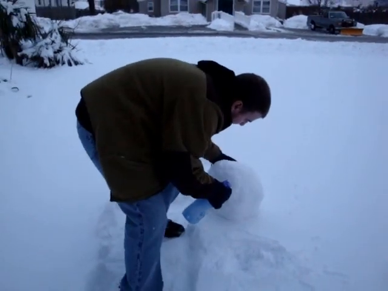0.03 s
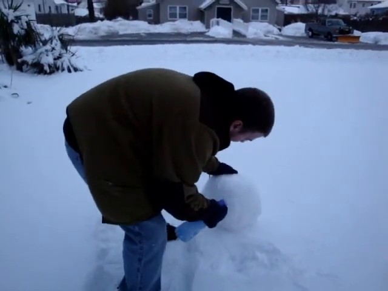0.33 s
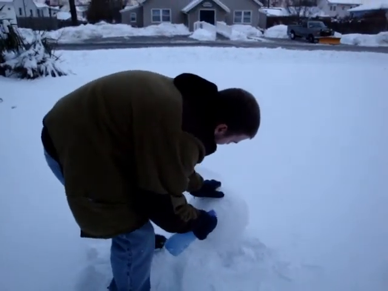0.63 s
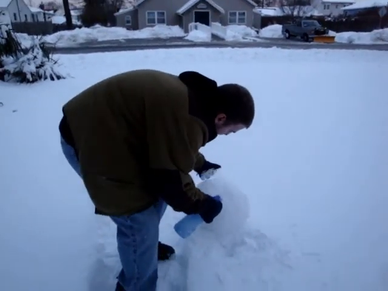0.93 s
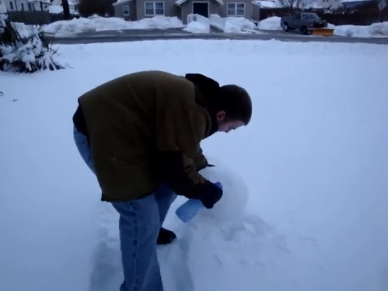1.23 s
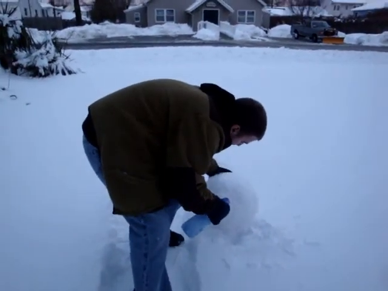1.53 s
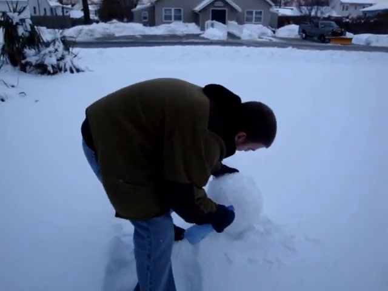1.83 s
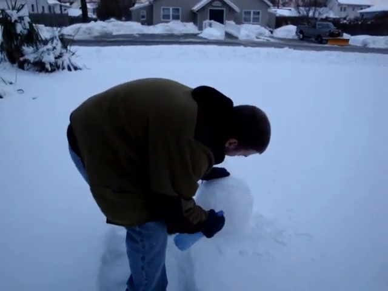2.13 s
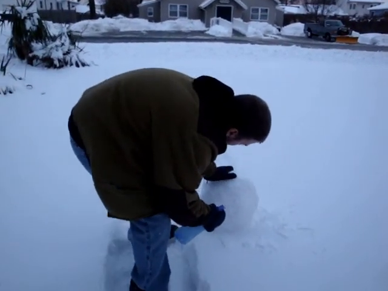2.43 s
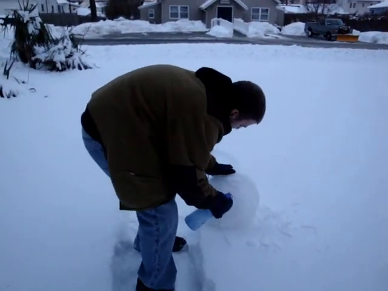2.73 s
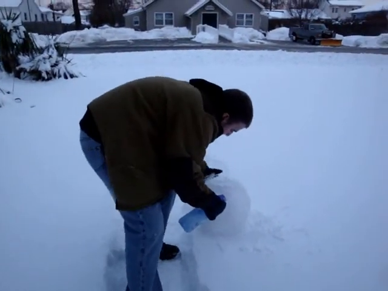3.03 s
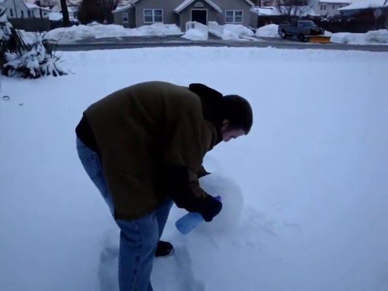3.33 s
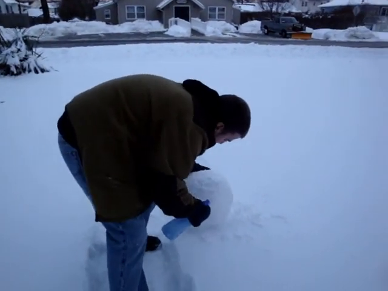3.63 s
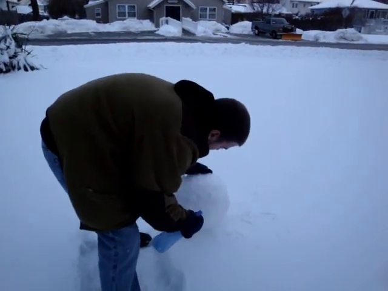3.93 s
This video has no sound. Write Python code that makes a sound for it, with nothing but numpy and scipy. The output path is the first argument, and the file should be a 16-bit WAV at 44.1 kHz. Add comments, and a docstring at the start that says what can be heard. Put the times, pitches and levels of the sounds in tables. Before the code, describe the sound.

A spray bottle squirts repeatedly with plastic clicks, amid dull knocks on the microphone.

```python
"""A trigger spray bottle mists a large snowball in a snowy yard, about three strokes a second.
Close by, each stroke clicks the plastic trigger, often chirps the pump valve, and lets out a puff of hiss.
Right at the microphone, fingers knock dully on the camera body; its audio coding adds a faint fizz to each.
A boot shifts in the snow, and the street murmurs far away. The snow gives no echo."""
import sys
import numpy as np
from scipy import signal
from scipy.fft import rfft, irfft, next_fast_len
from scipy.io import wavfile
from scipy.ndimage import map_coordinates

SR = 44100
rng = np.random.default_rng(int(sys.argv[2]) if len(sys.argv) > 2 else 0)


def generate_wav(signal):
    """Clip the signal to [-1, 1] and save it as 16-bit WAV at the path in sys.argv[1]."""
    frames = np.transpose(np.atleast_2d(signal))
    scaled = np.clip(frames, -1, 1) * 32767
    pcm = np.round(scaled).astype(np.int16)
    wavfile.write(sys.argv[1], SR, pcm)


N = 176400  # 4 s

# pulls of the trigger: t/s, relative level/dB
STROKES = [(.1476, -21), (0.4476, -20), (0.7659, -17.5), (1.0830, -18.5), (1.39, -20), (1.6955, -19.5),
           (1.9886, -18.5), (2.2874, -19.5), (2.5966, -18), (2.9091, -21), (3.2218, -17.5), (3.5416, -18),
           (3.8463, -21)]
# the three clicks within a stroke: t/s after the pull, level/dB against the stroke
STROKE_CLICKS = [(0, -4), (0.0116, -0.5), (0.0196, -8.5)]
# lone ticks of the trigger: t/s, relative level/dB
LONE_TICKS = [(2.323, -27.5), (2.9818, -29), (3.2893, -30.5), (3.3, -33)]
# spectrum of the plastic spray head: f/Hz, level/dB
PLASTIC_SPECTRUM = [(100, -50), (1600, -15.5), (2400, 0), (3500, -1.5), (4800, 0), (7000, -7), (10000, -12),
                    (13000, -9.5), (15500, -4.5)]

def trigger(snap_t60_s=0.0026, ring_t60_s=0.021, ring_db=-10.5, gain_db=-4, size=2048):
    """Close by, each stroke snaps the plastic three times; every snap rings very briefly."""
    out, t = np.zeros(N), np.arange(size) / SR
    fade = amp(-60 * t / snap_t60_s) + amp(ring_db - 60 * t / ring_t60_s)
    clicks = [(s + delay, db + offset_db) for s, db in STROKES for delay, offset_db in STROKE_CLICKS]
    for s, db in clicks + LONE_TICKS:
        snap = struck(fade * rng.standard_normal(size), lambda hz: along(PLASTIC_SPECTRUM, hz))
        snap *= np.linalg.norm(fade) / np.linalg.norm(snap)  # equal energy in every snap
        add(out, s, amp(db + gain_db) * snap)
    return out


# chirps of the pump valve: t/s, level/dB, f/Hz
CHIRPS = [(0.7916, -24.5, 2530), (0.8387, -35.5, 2700), (1.1096, -25.5, 2740), (1.7466, -38, 2920),
          (1.753, -35, 3000), (2.3145, -26, 2660), (2.3634, -38, 2860), (2.9367, -28, 2670),
          (3.873, -27, 2600)]

def valve(width_s=0.0012, rasp_db=-10, drift_rad=0.55):
    """In the spray head, the pump valve flutters for a few cycles: a rough, pitched chirp."""
    out, t = np.zeros(N), np.arange(N) / SR
    drift = drift_rad * wobble(910)
    rasp = amp(rasp_db) * noise(PLASTIC_SPECTRUM)
    for s, db, hz in CHIRPS:
        swell = (1 + ((t - s) / width_s) ** 2 / 2) ** -2
        out += amp(db) * swell * (np.sin(2 * np.pi * hz * (t - s) + drift) + rasp)
    return out


# puffs of mist: t/s, length/s, level/dB
PUFFS = [(-.03, 0.13, -48.5), (0.154, 0.18, -45), (.44, 0.23, -50), (0.868, 0.084, -46.5),
         (1.185, 0.066, -47), (1.473, 0.1, -47), (1.772, 0.12, -46.5), (2.074, .13, -49),
         (2.372, 0.084, -46.5), (2.685, 0.068, -47.5), (3.01, 0.064, -48), (3.317, 0.079, -46),
         (3.588, 0.091, -46.5), (3.88, .12, -53)]
# spectrum of a puff: f/Hz, level/dB
PUFF_SPECTRUM = [(200, -17), (1000, -16.5), (1700, 1), (2700, 2.5), (3500, 0.5), (4900, 1), (6300, -4.5),
                 (9700, -3), (13000, -13.5), (15500, -10.5)]
# hiss lingering between the puffs: t/s, level/dB
HISS_LEVEL = [(0, -43.5), (.38, -42), (.64, -42.5), (.73, -48.5), (.86, -52), (1.02, -59), (1.15, -50),
              (1.33, -51.5), (1.42, -48.5), (1.7, -49.5), (2.04, -46), (2.33, -45.5), (2.53, -54),
              (2.85, -52), (3.18, -54.5), (3.5, -48), (3.8, -46.5), (4, -44)]
# spectrum of that hiss: f/Hz, level/dB
HISS_SPECTRUM = [(200, -34), (1000, -13), (1700, -4), (2700, 1.5), (3500, 0.5), (4900, -2), (6300, -7),
                 (9700, -5), (13000, -9), (15500, -6)]

def spray(attack_s=0.024, release_s=0.037, sputter_db=1.5, surge_db=0.62):
    """Mist leaves the nearby nozzle in puffs over a lingering hiss."""
    flow, t = np.zeros(N), np.arange(N) / SR
    for s, length, db in PUFFS:
        rise = np.clip((t - s) / attack_s, 0, 1)
        fall = np.exp(-(np.maximum(t - s - length, 0) / release_s) ** 2)
        flow += amp(db) * rise * fall
    flicker = amp(sputter_db * wobble(150) + surge_db * wobble(35))
    puffs = flow * noise(PUFF_SPECTRUM)
    hiss = amp(curve(HISS_LEVEL)) * noise(HISS_SPECTRUM)
    return flicker * (puffs + hiss)


# knocks on the camera: t/s, level/dB, treble corner f/Hz, bass level/dB
KNOCKS = [(0.1076, -35, 450, 10), (.2008, -25.5, 1400, 0), (.3068, -23, 705, 2), (0.3109, -25, 700, 2),
          (0.5124, -13.5, 1310, 1), (0.522, -31, 910, -5), (.680, -29, 497, 8.5), (.684, -45, 450, 2),
          (.744, -33, 600, 4), (1.132, -24, 1140, 1), (1.501, -34.5, 500, 0), (1.588, -19, 756, 3),
          (1.5917, -30.5, 400, 11.5), (1.5986, -32.5, 504, 6), (1.6468, -25, 750, -4),
          (1.8293, -26.5, 1190, -7), (1.876, -28.5, 800, -1), (2.194, -30, 800, -5),
          (2.2483, -21.5, 680, -12), (2.848, -24, 474, -1), (2.8823, -23, 520, 0), (2.8859, -32, 400, 7),
          (2.9089, -24, 480, -1), (3.0332, -15, 770, 4), (3.039, -22.5, 550, 0), (3.6818, -7.5, 915, -3),
          (3.7364, -22.5, 1010, -1), (3.739, -18, 630, 5), (3.7412, -18, 600, 0)]
# response of the camera body: f/Hz, level/dB
BODY_SPECTRUM = [(30, -39), (80, -30.5), (150, -8.5), (300, -2), (450, -1), (800, -4), (1250, -6),
                 (1800, -12), (3000, -42)]
CODER_FIZZ_SPECTRUM = [(100, -60), (9000, -40), (11000, 7), (13500, 0), (15000, -20)]

def handling(shudder_t60_s=0.045, shudder_db=-26.5, fizz_t60_s=0.014, fizz_db=-20, size=4096):
    """At the microphone, fingers knock the camera: a dull push and a low shudder; the coding fizzes."""
    out, t = np.zeros(N), np.arange(size) / SR
    # 36 light, dark touches at random times
    touches = [(rng.uniform(0, N / SR), rng.uniform(-45, -39), 600, 0) for _ in range(36)]
    lowpass = signal.butter(2, 270, fs=SR, output="sos")
    push = -1.0 * (t == 0)
    shudder_fade = amp(shudder_db - 60 * t / shudder_t60_s)
    fizz_fade = amp(-60 * t / fizz_t60_s)
    for s, db, corner_hz, bass_db in KNOCKS + touches:
        def colour_db(hz):
            """Softer contacts have a lower corner and sound darker."""
            bass_shelf = bass_db / (1 + (hz / 254) ** 4)
            treble_loss = 12 * np.log10(1 + (hz / corner_hz) ** 4)
            return along(BODY_SPECTRUM, hz) + bass_shelf - treble_loss
        shudder = signal.sosfilt(lowpass, shudder_fade * rng.standard_normal(size))
        thud = struck(push + shudder, colour_db)
        fizz = struck(fizz_fade * rng.standard_normal(size), lambda hz: along(CODER_FIZZ_SPECTRUM, hz))
        add(out, s, amp(db) * (thud + amp(fizz_db) * fizz))
    return out


# shifts of the boot: centre t/s, half length/s, level/dB
BOOT_SHIFTS = [(0.223, 0.024, -40), (.49, 0.094, -51)]
# spectrum of packing snow: f/Hz, level/dB
SNOW_SPECTRUM = [(40, -35), (80, -4.5), (170, 2.5), (300, -13), (800, -6), (2000, -27), (6000, -45)]

def boot(crunch_db=3):
    """On the ground, snow packs under a shifting boot with a low, uneven crunch."""
    t = np.arange(N) / SR
    weight = sum(amp(db) * np.exp(-((t - s) / half) ** 2) for s, half, db in BOOT_SHIFTS)
    return weight * amp(crunch_db * wobble(200)) * noise(SNOW_SPECTRUM)


# traffic as heard in the yard: t/s, level/dB
STREET_LEVEL = [(0, -47.5), (.6, -45.5), (1.05, -48.5), (1.6, -45.5), (2.3, -46), (2.6, -48.5), (3.2, -48),
                (3.7, -45.5), (4, -47)]
# spectrum of the distant traffic: f/Hz, level/dB
STREET_SPECTRUM = [(25, -18), (60, -18), (120, -8), (250, 0), (450, 1), (850, 1.5), (1200, -2.5),
                   (1600, -8), (2500, -14.5), (5000, -24), (15000, -56)]

def street(waver_db=1.4):
    """Far beyond the yard, traffic murmurs steadily."""
    return amp(curve(STREET_LEVEL) + waver_db * wobble(12)) * noise(STREET_SPECTRUM)


def amp(db):
    """Decibels to gain."""
    return 10 ** (np.asarray(db) / 20)


def along(spectrum, hz):
    """Rows of f/Hz, level/dB read at hz on a log axis."""
    f, db = np.transpose(spectrum)
    return np.interp(np.log(hz + 1), np.log(f + 1), db)


def curve(rows):
    """Rows of t/s, level/dB read at every sample."""
    return np.interp(np.arange(N) / SR, *np.transpose(rows))


def wobble(rate):
    """A smooth random curve, rate knots a second."""
    knots = rng.standard_normal(int(N * rate / SR) + 4)
    return map_coordinates(knots, [np.arange(N) * rate / SR])


def filtered(x, response):
    """x through a gain that depends on frequency."""
    m = next_fast_len(N + SR // 2)
    return irfft(rfft(x, m) * response(np.fft.rfftfreq(m, 1 / SR)), m)[..., :N]


def noise(spectrum):
    """Coloured noise of rms 1."""
    x = filtered(rng.standard_normal(N), lambda hz: amp(along(spectrum, hz)))
    return x / x.std()


def struck(force, colour_db):
    """A short force through a minimum-phase filter, scaled to peak 1."""
    n = len(force)
    gain = amp(colour_db(np.fft.rfftfreq(n, 1 / SR)))
    cepstrum = irfft(np.log(gain + 1e-6))
    cepstrum[1:n // 2] *= 2  # folded so that the ringing follows the force
    cepstrum[n // 2 + 1:] = 0
    x = irfft(rfft(force) * np.exp(rfft(cepstrum)))
    return x / np.abs(x).max()


def add(out, s, x):
    """Mix x into out at time s."""
    i = int(np.clip(round(s * SR), 0, N))
    out[i:i + len(x)] += x[:N - i]


def scene():
    """The yard from the camera's position, without echo and alike in both channels."""
    mono = trigger() + valve() + spray() + handling() + boot() + street()
    return np.array([mono, mono])


# response of the camera microphone: f/Hz, level/dB
MICROPHONE = [(20, -2.5), (9900, -0.5), (10200, -12), (16000, -9)]

def record(dry):
    """The camera microphone dulls the top treble and keeps nothing above 16 kHz."""
    return filtered(dry, lambda hz: amp(along(MICROPHONE, hz)) * (hz < 16000))


dry = scene()
out = record(dry)
generate_wav(out)
```